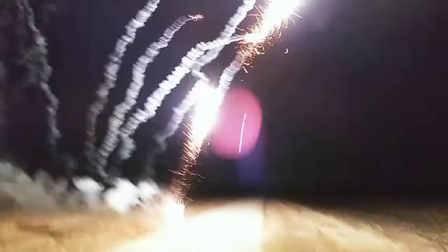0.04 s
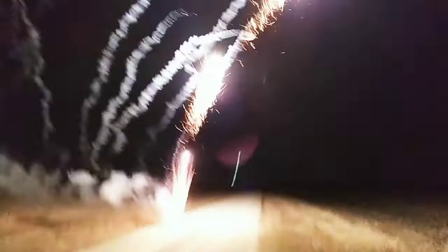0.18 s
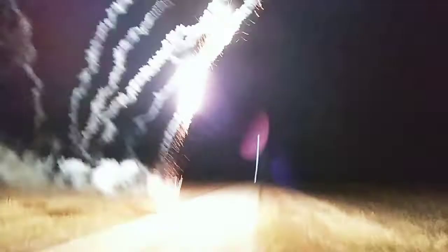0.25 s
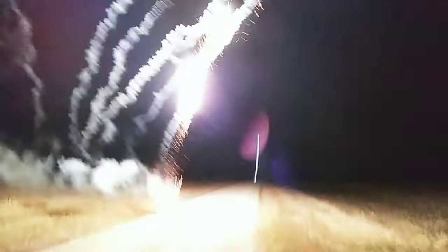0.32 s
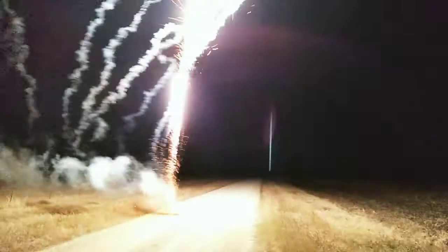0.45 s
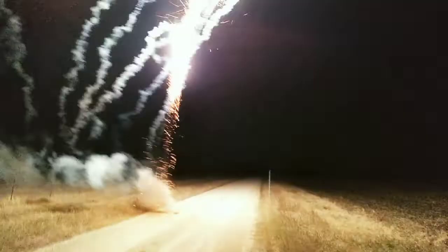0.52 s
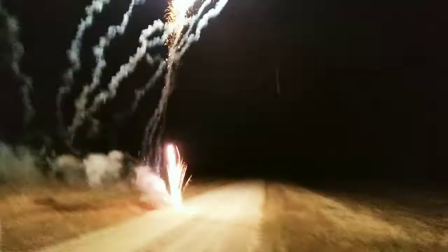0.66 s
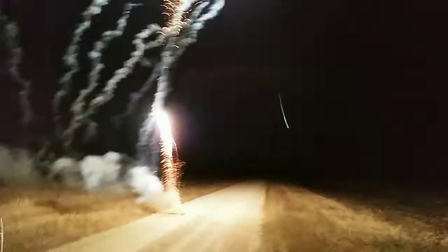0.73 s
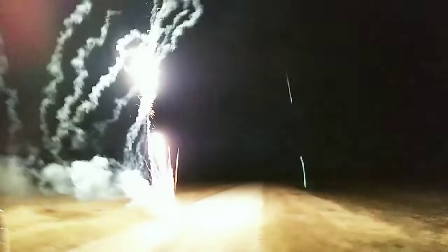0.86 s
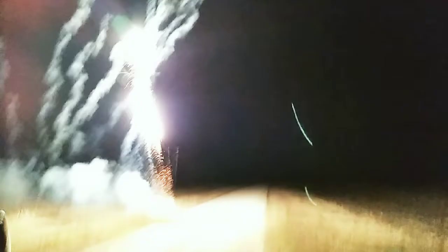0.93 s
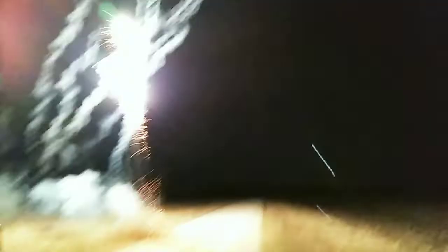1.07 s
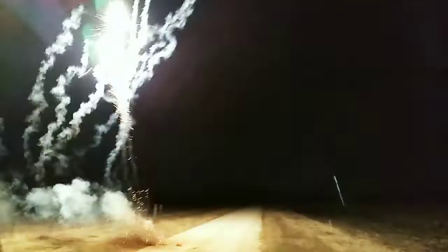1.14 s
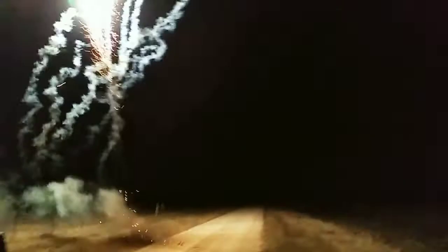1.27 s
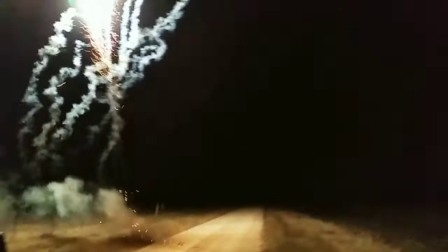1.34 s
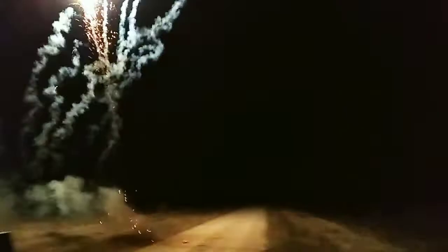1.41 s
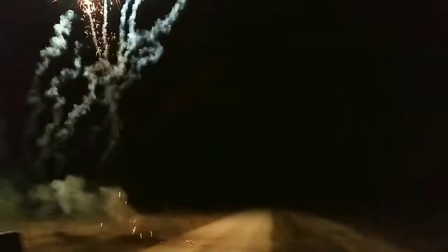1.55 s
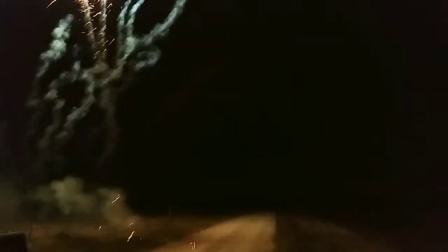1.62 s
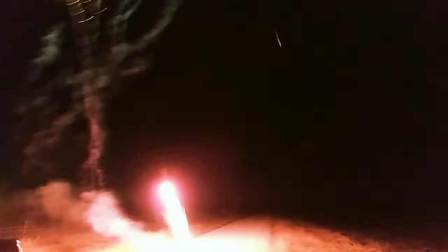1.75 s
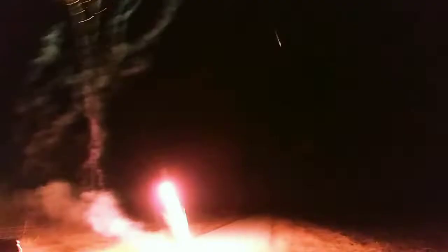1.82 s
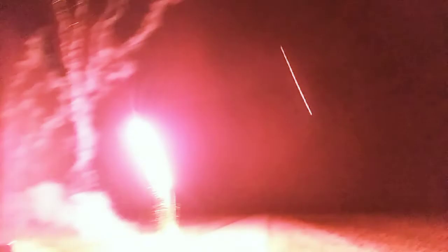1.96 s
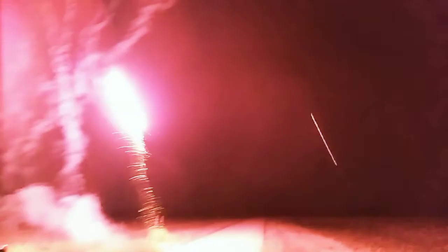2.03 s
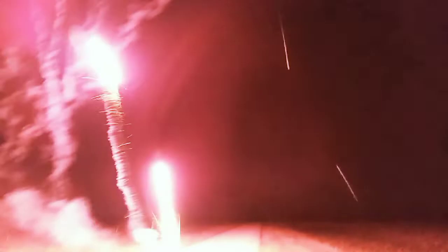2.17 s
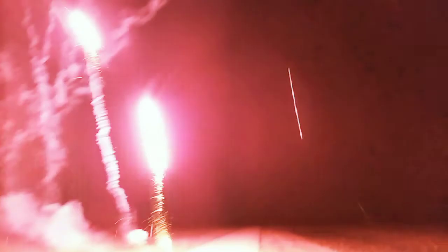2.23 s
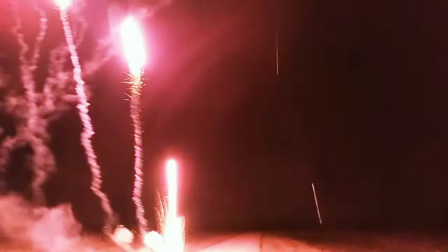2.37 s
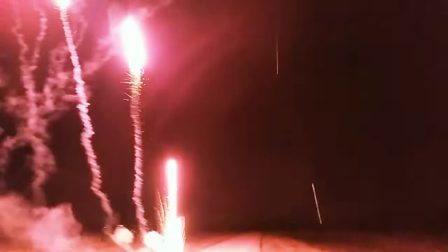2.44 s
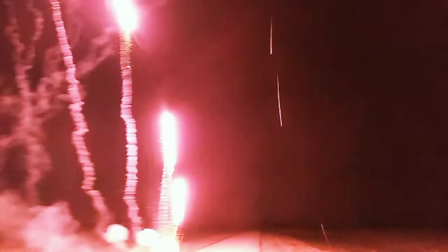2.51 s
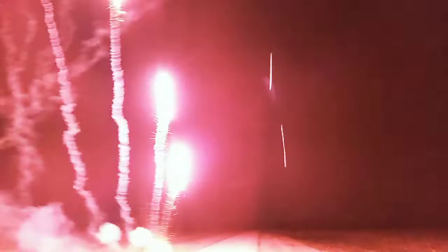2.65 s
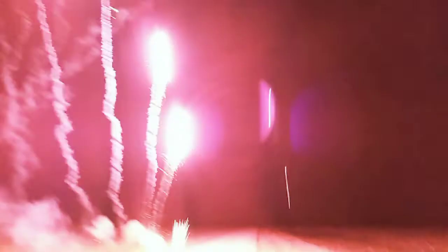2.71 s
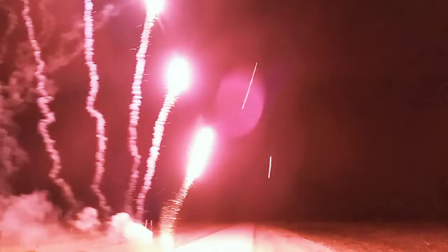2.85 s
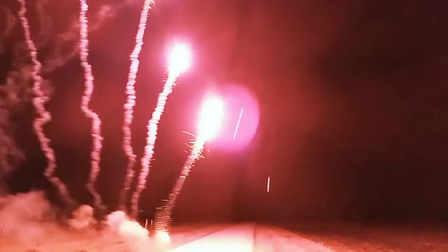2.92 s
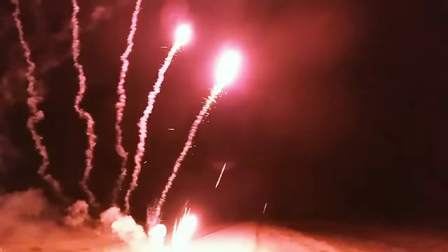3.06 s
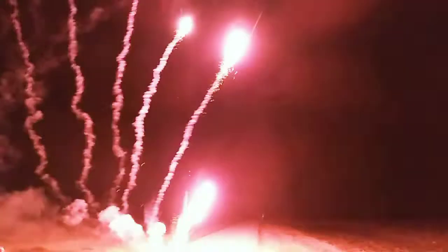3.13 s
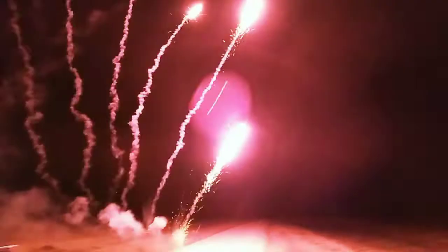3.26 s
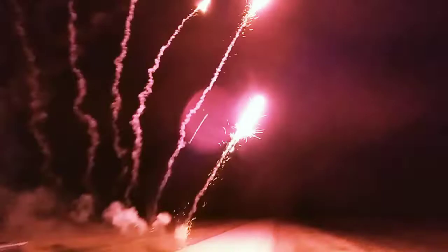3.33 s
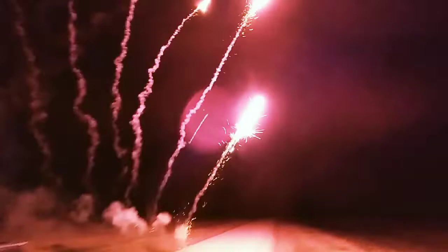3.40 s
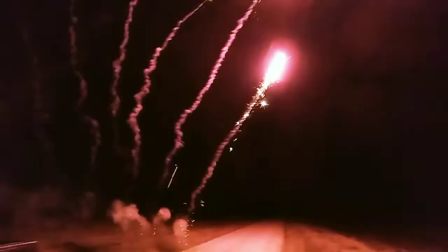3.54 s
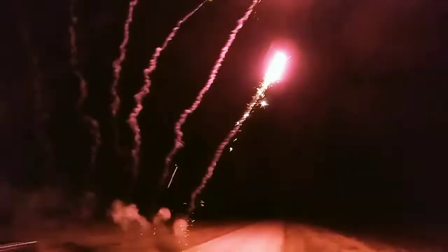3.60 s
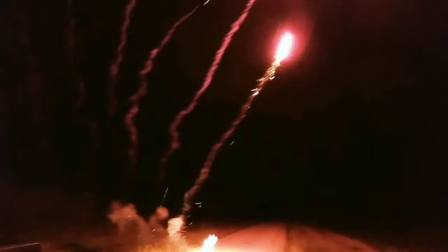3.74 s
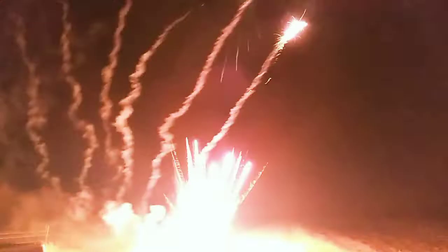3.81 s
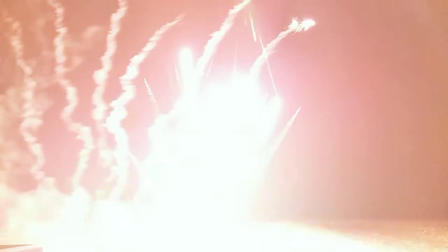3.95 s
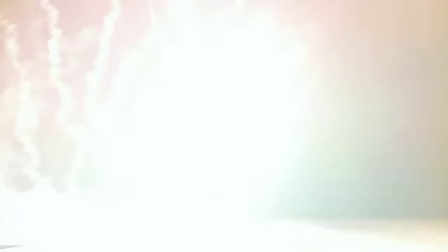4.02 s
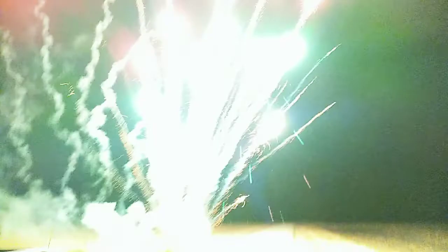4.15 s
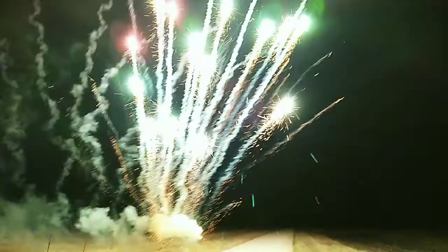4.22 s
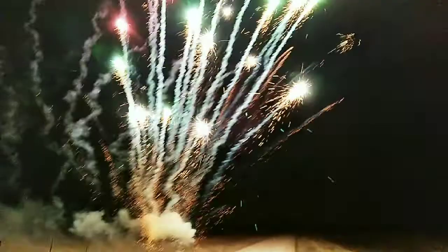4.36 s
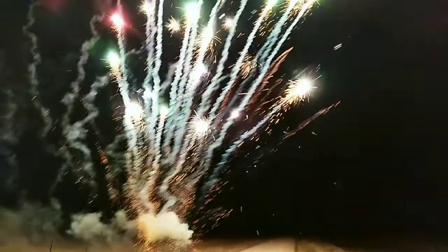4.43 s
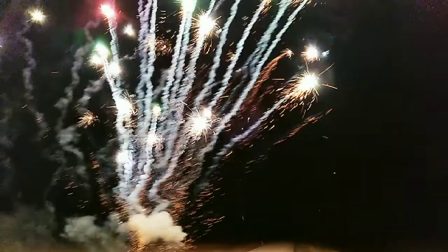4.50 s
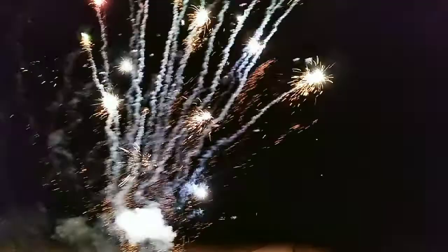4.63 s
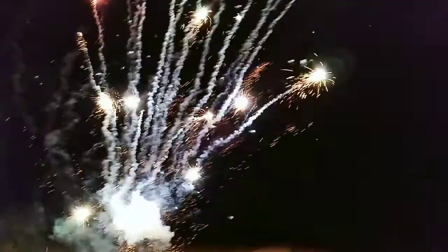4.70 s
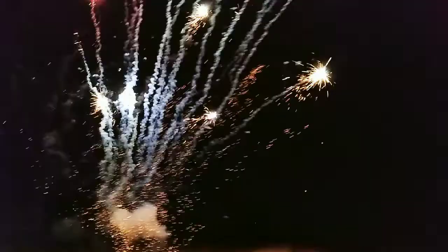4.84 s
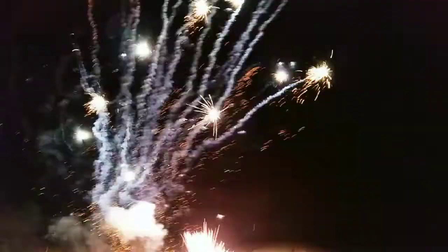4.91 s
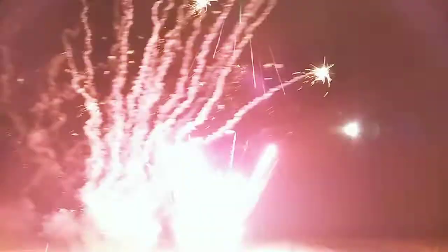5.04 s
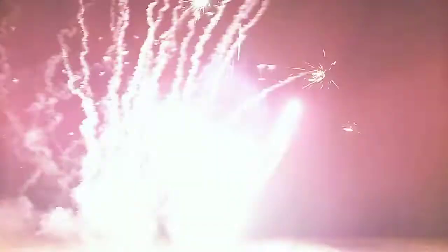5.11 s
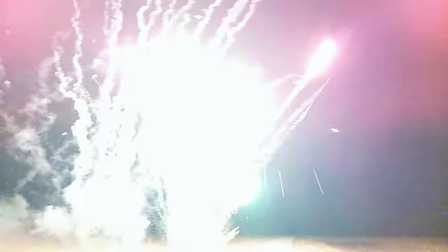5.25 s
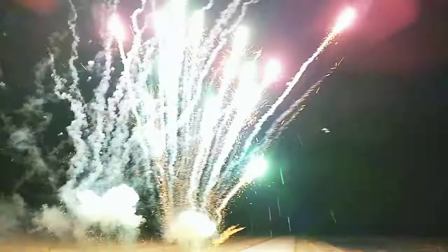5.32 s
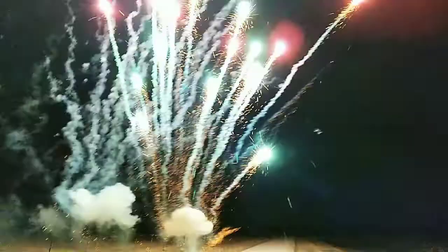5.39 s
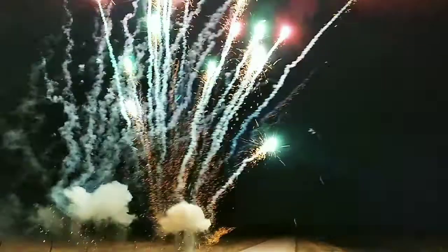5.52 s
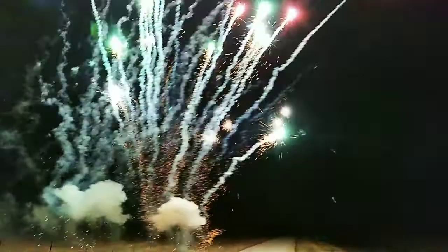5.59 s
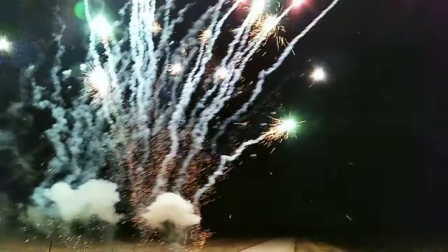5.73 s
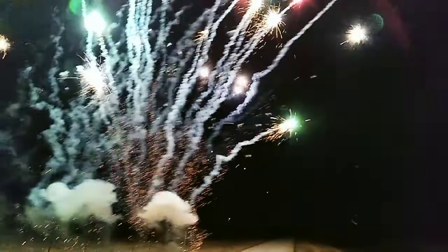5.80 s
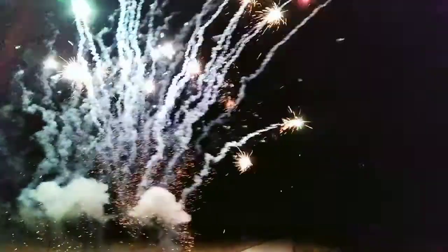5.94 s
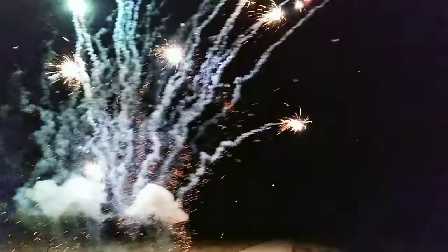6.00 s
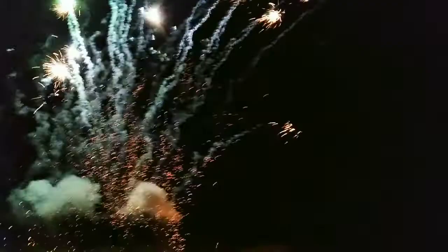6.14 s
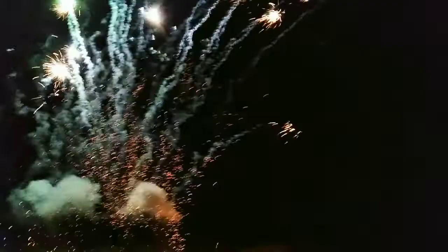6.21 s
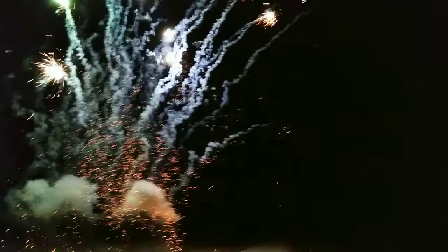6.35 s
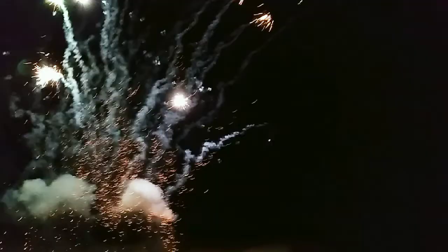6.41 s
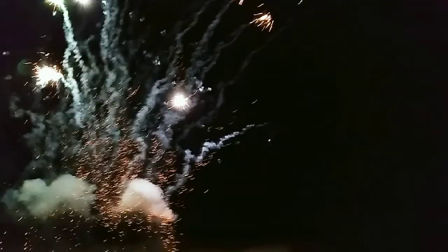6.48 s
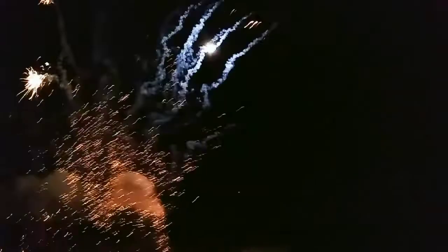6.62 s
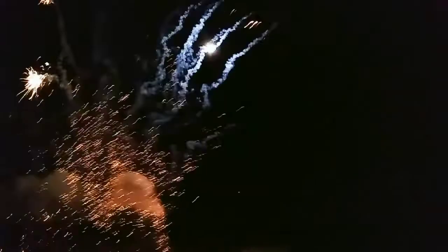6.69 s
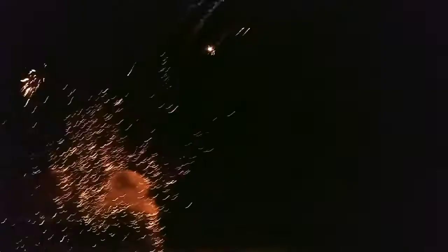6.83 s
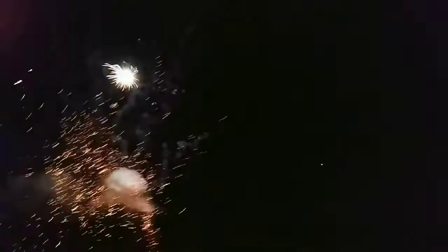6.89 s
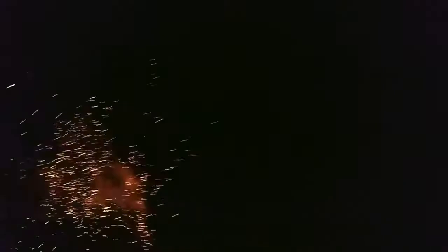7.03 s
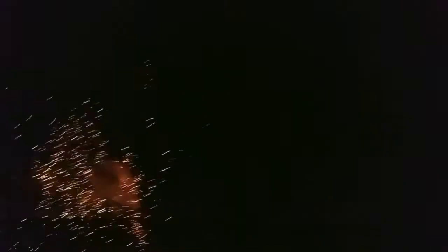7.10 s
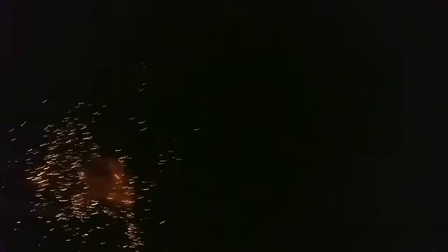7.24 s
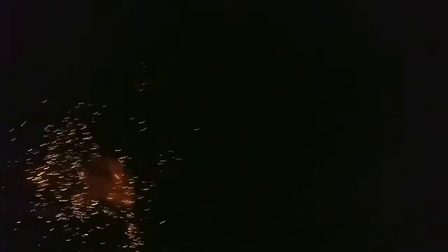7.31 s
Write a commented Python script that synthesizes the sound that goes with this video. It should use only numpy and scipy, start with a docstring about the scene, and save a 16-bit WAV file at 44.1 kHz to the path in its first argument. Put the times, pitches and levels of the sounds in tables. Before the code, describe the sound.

Wind rumbles at a small, bright-sounding microphone as nearby firework tubes thump one after another, throwing up fizzing comets. A thin crackle comes early, then more thumps and hiss. Later, bursts of tubes fire almost together and the air fills with dense, hard, clipped cracks with short ground echoes. A few last heavy bangs thin out quickly, and only gusty buffeting remains in the open field.

```python
"""A firework cake empties itself in an open field at night, close to a small microphone.
Tubes thump as pressure pulses ring them, comet tails sizzle with random sparks, and stars crack as
short noise bursts, singly and in salvos; each comes back from the ground and echoes over the field.
Wind rumbles and slaps at the microphone as shaped noise. Its port rings near 8.5 kHz in the sparks
and cracks, and it overloads on loud cracks."""
import sys
import numpy as np
from scipy import signal
from scipy.fft import rfft, irfft
from scipy.io import wavfile
from scipy.ndimage import uniform_filter1d

SR = 44100
rng = np.random.default_rng(int(sys.argv[2]) if len(sys.argv) > 2 else 0)


def unload_audio(sound):
    """Save the sound as a 16-bit wav file, at the path given as the first command line argument."""
    columns = np.transpose(np.atleast_2d(sound))
    # keep every value between -1 and 1, then stretch to whole-number steps
    steps = np.round(np.clip(columns, -1, 1) * 32767)
    wavfile.write(sys.argv[1], SR, steps.astype(np.int16))


N = 324576

# Tubes firing, singly or in a rippling volley, and the comets they throw.
# Each row: start in seconds, thump peak in dB before the trim in launches(), tube pitch in Hz,
# length of the ripple in seconds, sizzle in dB, time from launch to fading in seconds.
LAUNCHES = [(0.1, -8, 1013, 0, -17, .4), (0.315, -8.5, 1160, 0, -18.5, 0.352),
            (0.576, -10.5, 1064, 0, -22, 0.28), (0.789, -5.5, 1058, 0, -16.5, 0.286),
            (1.638, -8.5, 1007, 0, -19, 0.307), (1.962, -4.5, 933, 0, -17.5, 0.326),
            (2.26, -7.5, 1110, 0, -25.5, .4), (2.321, -8.5, 984, 0, -18.5, .42),
            (2.644, -10.5, 905, 0, -17.5, 0.566), (3.028, -11, 1096, 0, -16, 0.3915),
            (3.642, -7, 960, .028, -15, 0.617), (3.704, -12, 1152, .056, -15.5, 0.964),
            (4.888, -7.5, 1060, .028, -17, .7), (4.945, -11.5, 1095, .038, -16, 0.967),
            (5.083, -10.5, 1470, 0, -20.5, 0.4926)]
# Colour of small sparks at the microphone, port ring included.
# Each row: frequency in Hz, relative level in dB per Hz.
SPARK_COLOUR = [(150, -32.5), (600, -18.5), (1200, -14), (1950, -12.5), (3100, -20), (4900, -10.5),
                (7200, -9), (8550, 2), (9500, -5), (10400, -10), (11900, -19), (14000, -17), (16000, -22)]
GROUND_ECHO_MS = (3.6, 6.3)  # for the lowest and the highest stars


def gain_of(db):
    """Decibels to amplitude."""
    return 10 ** (np.asarray(db) / 20)


def evened(x):
    """Scales to rms 1."""
    return x / np.sqrt(np.mean(x ** 2) + 1e-20)


def read(points, hz):
    """A spectrum's value at hz, interpolated on a log-frequency axis."""
    f, value = np.transpose(points)
    return np.interp(np.log(hz + 1e-3), np.log(f), value)


def add(mix, s, sound):
    """Mixes a sound in at time s."""
    part = mix[max(round(s * SR), 0):][:len(sound)]
    part += sound[:len(part)]


def ring(colour, unit_hz=1, size=1024):
    """Causal (minimum-phase) impulse response of energy 1 with the given spectrum."""
    hz = abs(np.fft.fftfreq(size, 1 / SR))
    log_gain = np.log(gain_of(read(colour, hz / unit_hz)))
    spectrum = np.exp(np.conj(signal.hilbert(log_gain)))
    response = np.fft.ifft(spectrum).real[:size // 2]
    return response / np.linalg.norm(response)


def noise(colour, swell):
    """Noise of rms 1 that swells and sinks, with the given spectrum."""
    shape = gain_of(read(colour, np.fft.rfftfreq(N, 1 / SR)))
    spectrum = rfft(rng.standard_normal(N) * swell)
    return evened(irfft(spectrum * shape, N))


def wander(hz):
    """Random drift of rms 1, strongest a little below hz and dying out above it."""
    f = np.fft.rfftfreq(N, 1 / SR)
    band = f / hz * np.exp(-(f / hz) ** 2)
    return evened(irfft(rfft(rng.standard_normal(N)) * band, N))


def burst(response, decay_s, size=512):
    """A sudden, dying puff of noise through a response; energy 1."""
    puff = rng.standard_normal(size) * np.exp(-np.arange(size) / SR / decay_s)
    sound = np.convolve(puff, response)
    return sound / np.linalg.norm(sound)


def tubes(count=12):
    """Rows (s, peak dB, pitch Hz) of every tube: in a volley the fuse runs on from one to the next."""
    fuse_s, fuse_slip_s = .008, .003
    spread_db, detune = 3.5, 0.092  # from tube to tube within a volley
    rows = []
    for s, db, hz, ripple_s, _, _ in LAUNCHES:
        rows.append((s, db, hz))
        for k, (slip, size, tone) in enumerate(rng.uniform(-1.01, 1, (count, 3)), 1):
            if k * fuse_s < ripple_s:
                fired_s = s + k * fuse_s + slip * fuse_slip_s
                rows.append((fired_s, db + size * spread_db, hz * (1 + tone * detune)))
    return rows


def launches(level_db=2, blast_s=0.000227, ground_s=0.002109, ground_db=-1,
             scatter_db=-25, scatter_s=0.023, size=4096):
    """The lift charge's pressure pulse rings its cardboard tube; the ground returns and scatters it."""
    # The thump of a tube. Each row: multiple of its pitch, relative level in dB per Hz.
    tube_colour = [(.08, -18), (.35, -1.5), (.6, -8.5), (1, 3.5), (1.3, -4), (1.9, -6), (2.6, -23),
                   (8, -43)]
    out, t = np.zeros(N), np.arange(size) / SR
    pulse = (1 - t / blast_s) * np.exp(-t / blast_s)
    for s, db, hz in tubes():
        scatter = gain_of(scatter_db) * np.exp(-t / scatter_s) * rng.standard_normal(size)
        blast = pulse + scatter
        add(blast, ground_s * rng.uniform(0.719, 1.3944), gain_of(ground_db) * pulse)
        thump = signal.fftconvolve(blast, ring(tube_colour, hz))
        add(out, s, gain_of(db + level_db) * thump / abs(thump).max())
    return out


def cracks(rows, echo_db=-4, shortest_s=.00004, growth_s=0.00129, longest_s=0.0008, full_size=0.655):
    """Each star bursts with a shock, longer and deeper the bigger it is; the ground returns it later."""
    # Colour of a big crack, port ring included. Each row: frequency in Hz, relative level in dB per Hz.
    crack_colour = [(100, -25.5), (500, -13.5), (1000, -14), (1500, -5.5), (2000, -6.5), (3100, -16.5),
                    (4300, -10.5), (7200, -8.5), (8500, 2.5), (9500, -7), (11500, -21), (14000, -22.5),
                    (16000, -29)]
    level_span_s = .0025  # a row's level is the direct burst's rms over this time
    out, thin, full = np.zeros(N), ring(SPARK_COLOUR), ring(crack_colour)
    for s, db, echo_ms in rows:
        depth = min(gain_of(db) / full_size, 1) ** 2
        response = depth * full + (1 - depth) * thin
        direct, echo = (0, gain_of(db)), (echo_ms / 1000, gain_of(db + echo_db))
        for delay_s, size in (direct, echo):
            decay_s = min(shortest_s + growth_s * size, longest_s)
            add(out, s + delay_s, size * np.sqrt(level_span_s * SR) * burst(response, decay_s))
    return out


def single_stars():
    """Cracks of the single stars that stand out."""
    # Each row: start in seconds, level in dB, delay of the ground echo in ms.
    stars = [(0.6625, -9, 4.9), (1.1049, -9, 4.8), (1.1629, -8, 4.33), (1.2321, -12.5, 5.3),
             (1.273, -10.5, 5.36), (1.3569, -14, 5.4), (1.3877, -16.5, 5.9), (1.4407, -23, 5.4),
             (1.4672, -14, 5.3), (1.6398, -20.5, 6.9), (1.6983, -18.5, 5.5), (1.7214, -19, 3.92),
             (1.7466, -16, 6.6), (2.0218, -11, 4.8), (2.0793, -7.5, 4.7), (2.7568, -10, 5.74),
             (3.4759, -4, 4.8), (3.7239, -6, 5.7), (4.7949, -1.5, 5.8), (4.8351, -0.5, 3.79),
             (4.8707, 0.5, 4.8), (4.9265, -3, 6.3), (5.009, -4, 4.52), (5.0832, -4, 3.1),
             (5.3415, -2.5, 5.3), (5.6789, 1.5, 5.0), (6.1045, 0, 6.63), (6.1293, -0.5, 3.3),
             (6.2668, 6, 6.1), (6.3106, 3.5, 3.98), (6.3622, -0.5, 6.3), (6.4163, -18, 6.13),
             (6.4765, -13.5, 3.6), (6.543, -23.5, 3.27), (6.5998, .5, 4.72), (6.7187, -1, 4.31)]
    return cracks(stars)


def salvos(spread_db=4, disorder=1.6, count=96):
    """Rows of cracks: a swarm's stars go off one after another, unevenly and at all heights."""
    # Swarms of crackling stars, faint or loud.
    # Each row: start in seconds, length in seconds, cracks per second, middle level in dB.
    swarms = [(1.3, .43, 115, -23), (3.521, .2, 70, -17), (4.339, 0.1174, 81.6, -6.5),
              (4.46, .33, 109.1, -3.5), (4.884, .115, 95, -5.5), (5.429, .2, 36, -6), (5.696, .39, 116, -3),
              (6.139, 0.0561, 116, -4)]
    rows = []
    for s, length_s, per_s, db in swarms:
        slip, size, height = rng.random((count, 3)).T
        after_s = (np.arange(count) + disorder * slip) / per_s
        levels = db + spread_db * (2 * size - 1)
        echo_ms = np.interp(height, [0, 1], GROUND_ECHO_MS)
        swarm = np.column_stack([s + after_s, levels, echo_ms])
        rows.extend(swarm[after_s < length_s])
    return rows


def comets(until_s=np.inf):
    """Power of the sizzle: each launch lights a comet that flares, burns and fades as it climbs away."""
    ignite_s, flare_s, fade_db_per_s = .05, .18, 47
    t, power = np.arange(N) / SR, np.zeros(N)
    burning = [(-.3, -16, 0.48)]  # already in the air: start s, sizzle dB, time to fading s
    burning += [(s, db, burn_s) for s, _, _, _, db, burn_s in LAUNCHES if s < until_s]
    for s, db, burn_s in burning:
        flare = np.clip((t - s - ignite_s) / flare_s, 0, 1)
        fade_db = fade_db_per_s * np.maximum(t - s - burn_s, 0)
        power += flare * gain_of(db - fade_db) ** 2
    return power


def sizzle(power, per_s=14000, crowding=.5, spread_db=4.0, clump_db=3.0, echo_db=-5, count=24):
    """Tiny sparks of very unequal size: single ticks when few stars burn, a hiss when many do."""
    clumps = gain_of(clump_db * wander(45))
    rate = per_s * (power + 1e-9) ** crowding * clumps + 60  # sparks per second
    size = evened(gain_of(spread_db * np.minimum(rng.exponential(1, N), 4.5)))
    sparks = (rng.random(N) < rate / SR) * size * rng.choice([-1, 1], N)
    # the level follows the comets' power, however many sparks share it
    sparks = sparks * np.sqrt(power * SR / uniform_filter1d(rate, 4001))
    height, out = rng.integers(0, count, N), sparks.copy()
    for k, delay_s in enumerate(np.linspace(.0034, .0064, count)):  # higher sparks have later ground echoes
        add(out, delay_s + rng.uniform(0, .0001), gain_of(echo_db) * sparks * (height == k))
    coloured = signal.oaconvolve(out, ring(SPARK_COLOUR))[:N]
    return coloured / np.hypot(1, gain_of(echo_db))


def flames():
    """The first comets burn white, with a flame whose fluttering rush lies beneath the sizzle."""
    # Each row: frequency in Hz, relative level in dB per Hz.
    flame_colour = [(200, -20), (700, -4.5), (1400, 1), (2000, 0.5), (2900, -13), (6000, -27.5)]
    white_until_s, level_db = 1.5, -17.5  # level against the sizzle
    flutter_db, flutter_hz = 4, 45
    flutter = gain_of(flutter_db * wander(flutter_hz))
    return gain_of(level_db) * np.sqrt(comets(white_until_s)) * noise(flame_colour, flutter)


def pops(power, spread_db=3):
    """Rows of small cracks at random moments, a little louder than the comets that shed them."""
    pops_per_s, over_db = 7, 4.5  # how far they stand above the sizzle, on average
    at = np.flatnonzero(rng.random(N) < pops_per_s / SR)
    size, height = rng.random((2, N))[:, at]
    sizzle_db = 10 * np.log10(power[at] + 1e-12)
    levels = sizzle_db + over_db + spread_db * (2 * size - 1)
    return np.column_stack([at / SR, levels, np.interp(height, [0, 1], GROUND_ECHO_MS)])


def field_echo(near_db=9, near_s=0.0174, start_s=0.0018):
    """Scatter from grass close by, then a long faint echo whose bass dies first."""
    # Each row: frequency in Hz, time to fall by 60 dB in seconds.
    field_t60 = [(200, 0.04), (1500, 0.384), (4500, 0.69), (8500, .5), (14000, 0.65)]
    # Each row: frequency in Hz, echo in dB before the near scatter and the mix level.
    field_colour = [(300, -15), (1800, -13), (3200, -11), (5000, -11.5), (8500, -16), (13000, -12.5)]
    hz, t, z = signal.stft(rng.standard_normal(SR), SR, nperseg=256)
    t60 = read(field_t60, hz)[:, None]
    even_energy = np.sqrt(2 * np.log(1000) / (t60 * SR))  # a long decay gets no extra energy
    fade = gain_of(-60 * t / t60) * even_energy
    colour = gain_of(read(field_colour, hz))[:, None]
    tail = signal.istft(z * fade * colour, SR)[1]
    t = np.arange(len(tail)) / SR
    return tail * (t > start_s) * (1 + gain_of(near_db) * np.exp(-t / near_s))


def field(x, count=6):
    """Stars burst all over the sky, so from moment to moment the echo takes another path."""
    place = np.arange(N) / SR * 130  # paths passed, at 130 per second
    out = np.zeros(N)
    for k in range(count):
        distance = np.minimum(abs((place - k) % count - count / 2), 1)
        share = np.cos(np.pi / 2 * distance)  # neighbouring paths crossfade at equal power
        out += signal.fftconvolve(x * share, field_echo())[:N]
    return out


def airflow():
    """Amplitudes of the rumble and of the small eddies: a breeze with puffs on top."""
    # The breeze between gusts. Each row: time in seconds, rumble in dB.
    breeze = [(0, -33), (.55, -35), (.8, -26.5), (1.3, -28), (1.75, -35.5), (2.05, -36), (2.3, -29),
              (3.75, -27), (4.4, -35), (4.8, -30), (5.3, -32), (5.95, -37), (6.3, -26.5), (6.8, -33),
              (7.36, -26.5)]
    # Separate puffs at the microphone. Each row: start in seconds, length in seconds,
    # rumble in dB, small eddies in dB before the trim in wind().
    gusts = [(0, 0.051, -21, -42), (.09, 0.0398, -23.5, -27), (0.301, 0.049, -23.5, -26),
             (.64, 0.0928, -18, -29), (1.332, 0.112, -19.5, -28.5), (1.548, 0.12, -28, -37.5),
             (1.819, .05, -23, -33.5), (2.108, 0.107, -22.5, -31.5), (2.26, .12, -24, -22),
             (2.409, 0.0933, -18, -23), (2.538, 0.0686, -20, -21), (2.79, 0.0783, -26.5, -24.5),
             (3.051, 0.081, -24, -23), (3.353, 0.1254, -22, -22), (3.563, 0.116, -23, -25.5),
             (3.763, 0.095, -23, -26.5), (4.022, 0.115, -26, -25.5), (4.2, 0.0411, -26.5, -29),
             (4.68, 0.0725, -25, -27.5), (5.11, 0.1656, -26, -32), (5.478, 0.0477, -23.5, -30),
             (5.579, 0.0893, -22, -26.5), (6.373, 0.0647, -19, -32.5), (6.502, 0.0552, -18, -29),
             (6.665, 0.0525, -22.5, -31.5), (6.777, 0.0164, -30, -23), (6.861, 0.1307, -20, -23),
             (7.006, 0.084, -21, -24.5), (7.167, 0.203, -22.5, -27)]
    breeze_eddy_db = -9.5  # against the rumble, before the same trim
    edge_s = 0.0211  # a puff rises and falls within this time
    t = np.arange(N) / SR
    breeze_s, breeze_db = np.transpose(breeze)
    rumble = gain_of(np.interp(t, breeze_s, breeze_db)) ** 2
    eddies = rumble * gain_of(breeze_eddy_db) ** 2
    for s, length_s, rumble_db, eddy_db in gusts:
        inside_s = np.minimum(t - s, s + length_s - t)
        puff = np.clip(inside_s / edge_s + .5, 0, 1) ** 2
        rumble = rumble + puff * gain_of(rumble_db) ** 2
        eddies = eddies + puff * gain_of(eddy_db) ** 2
    return np.sqrt(rumble), np.sqrt(eddies)


def wind(eddy_db=-2.5, rumble_lump_db=2.5, eddy_lump_db=6.0, lump_hz=38):
    """Turbulence at the port: each lump of air swells the rumble, and the small eddies even more."""
    # Each row of both: frequency in Hz, relative level in dB per Hz.
    wind_colour = [(15, -27.5), (38, -19), (65, -4), (100, 2), (160, -0.5), (250, -6), (380, -18.5),
                   (600, -39), (1200, -73)]
    eddy_colour = [(80, -26.5), (200, -2.5), (330, 3.5), (550, -7.5), (800, -16.5), (1100, -34),
                   (1600, -57), (3000, -70)]
    rumble, eddies = airflow()
    lumps = np.clip(wander(lump_hz), -2, 2)
    low = noise(wind_colour, gain_of(rumble_lump_db * lumps))
    high = noise(eddy_colour, gain_of(eddy_lump_db * lumps))
    return rumble * low + gain_of(eddy_db) * eddies * high


def buffets(level_db=1, length_s=0.00511, size=2048):
    """A sharp eddy swells and bursts on the port within a few hundredths of a second."""
    # The hardest slaps of wind. Each row: start in seconds, peak in dB before level_db is added.
    slaps = [(1.419, -17.5), (2.311, -9.5), (2.797, -10), (2.849, -13.5), (3.387, -10.5), (3.585, -14.5),
             (6.934, -14.5), (6.955, -14), (7.024, -10), (7.071, -16.5), (7.204, -17), (7.264, -11.5),
             (7.31, -9.5), (7.344, -13.5)]
    # Each row: frequency in Hz, relative level in dB per Hz.
    buffet_colour = [(40, -19), (150, -0.5), (350, 1.5), (600, -7.5), (850, -16), (1200, -35), (1700, -54),
                     (3000, -78.5)]
    out, t, response = np.zeros(N), np.arange(size) / SR, ring(buffet_colour)
    swell = t * np.exp(-(t / length_s) ** 1.34)
    for s, db in slaps:
        slap = signal.fftconvolve(swell * rng.standard_normal(size), response)
        add(out, s, gain_of(db + level_db) * slap / abs(slap).max())
    return out


def scene():
    """Firework, its echo over the field, and the wind."""
    power = comets()
    stars = single_stars() + cracks(salvos()) + cracks(pops(power))
    firework = launches() + stars + sizzle(power) + flames()
    gusts = wind() + buffets()
    return (firework + gain_of(-3.0) * field(firework) + gusts)[None]


def record(dry, ceiling=.57):
    """The microphone overloads with a firm knee; then the band ends at 15.9 kHz."""
    clipped = dry / (1 + (dry / ceiling) ** 6) ** (1 / 6)
    low_pass = signal.firwin(511, 15900, window=("kaiser", 9), fs=SR)
    return signal.oaconvolve(clipped, low_pass[None], "same")


dry = scene()
out = record(dry)
unload_audio(out)
```